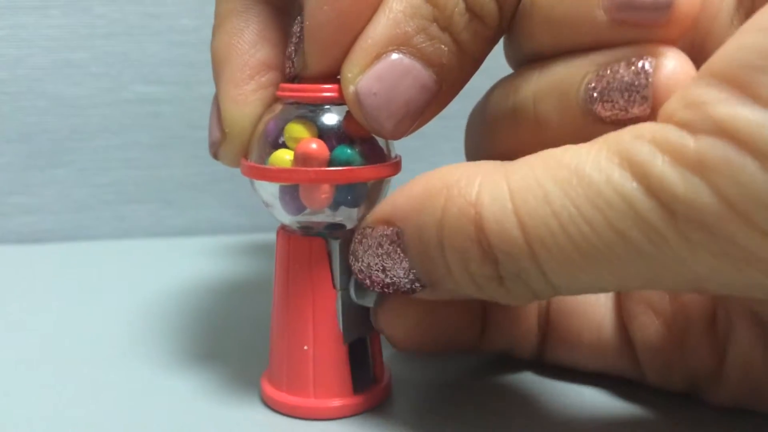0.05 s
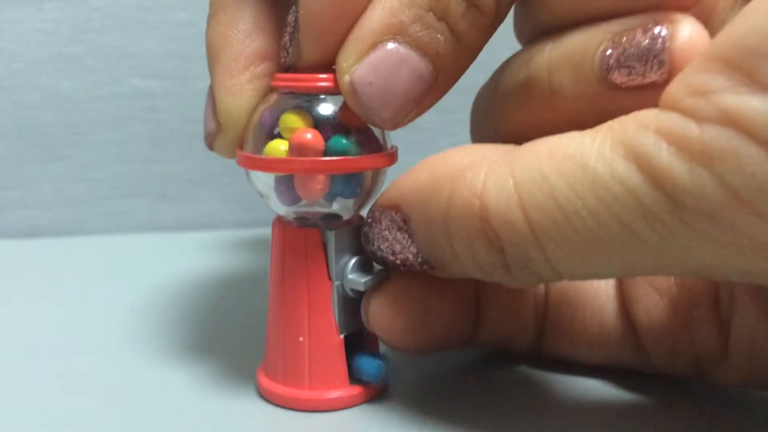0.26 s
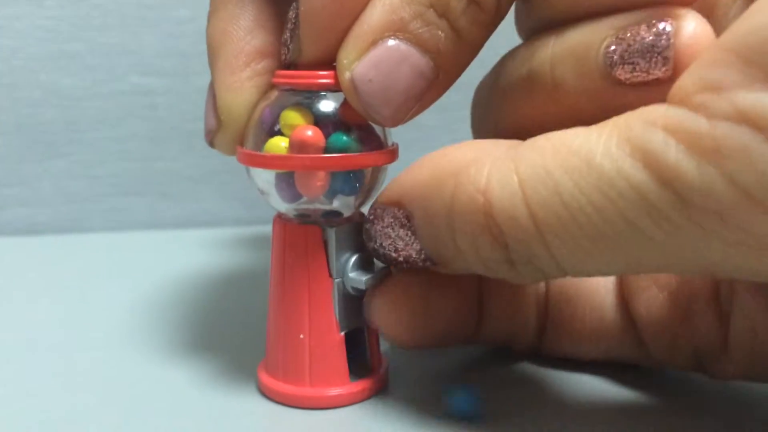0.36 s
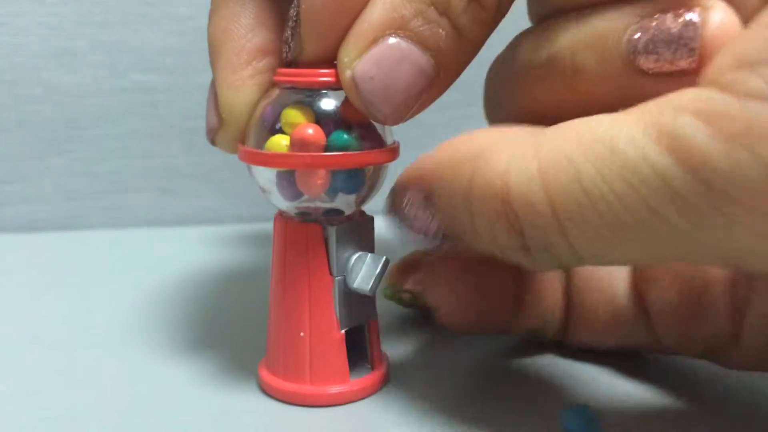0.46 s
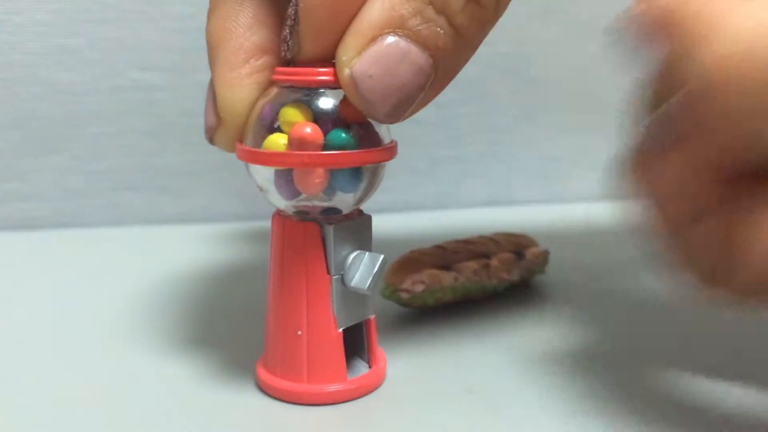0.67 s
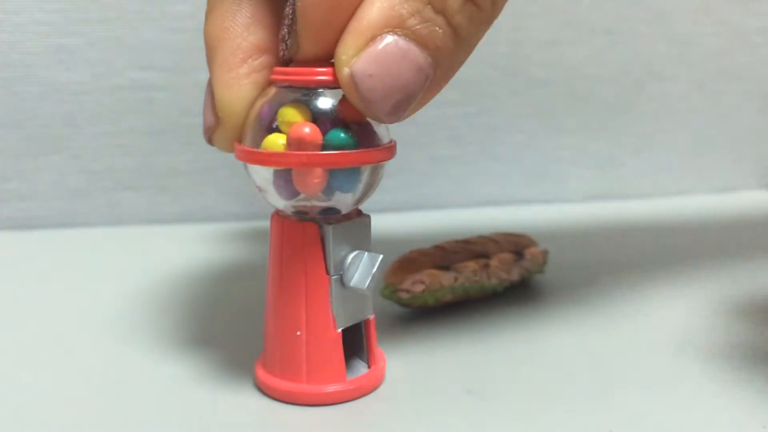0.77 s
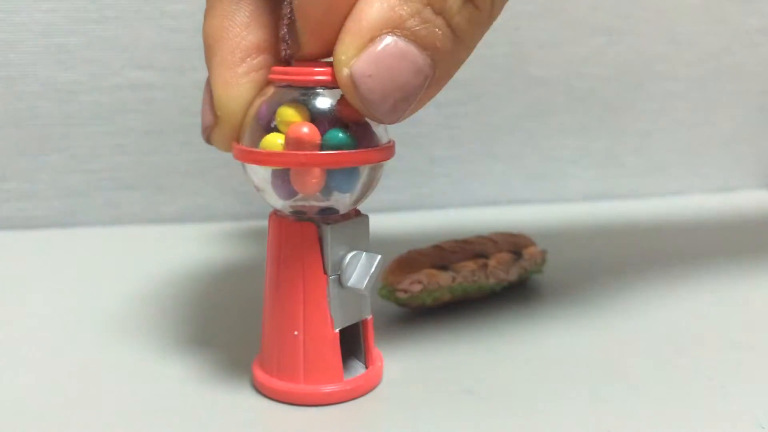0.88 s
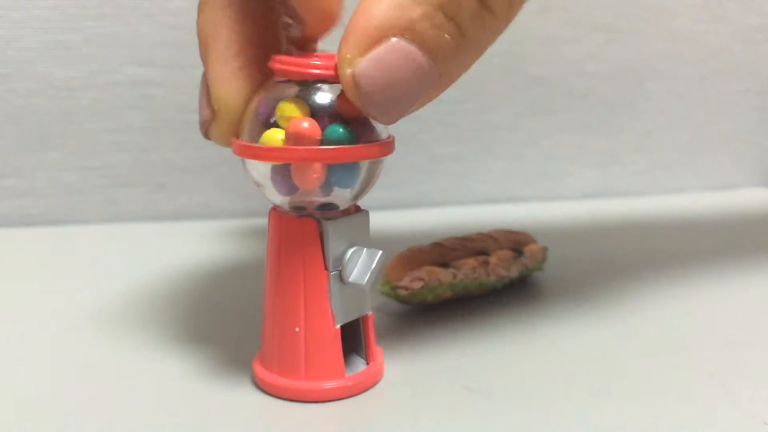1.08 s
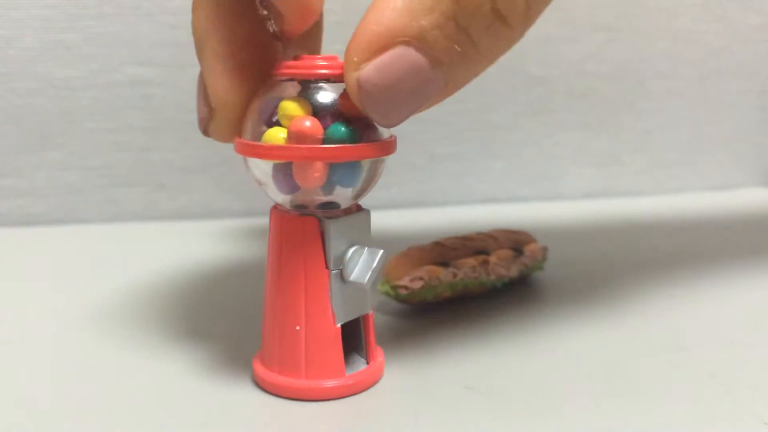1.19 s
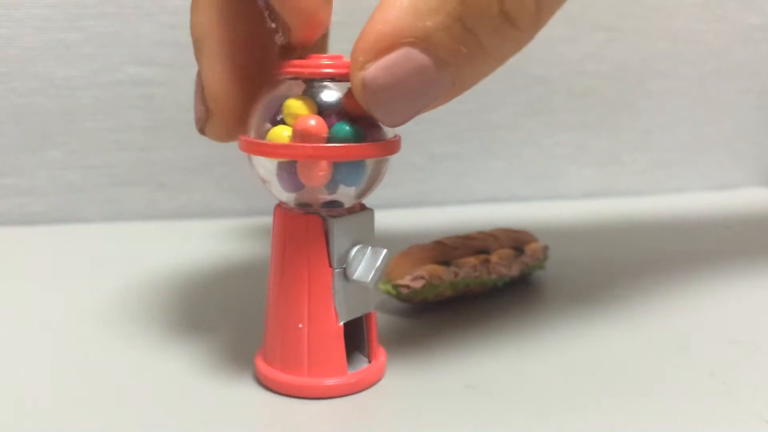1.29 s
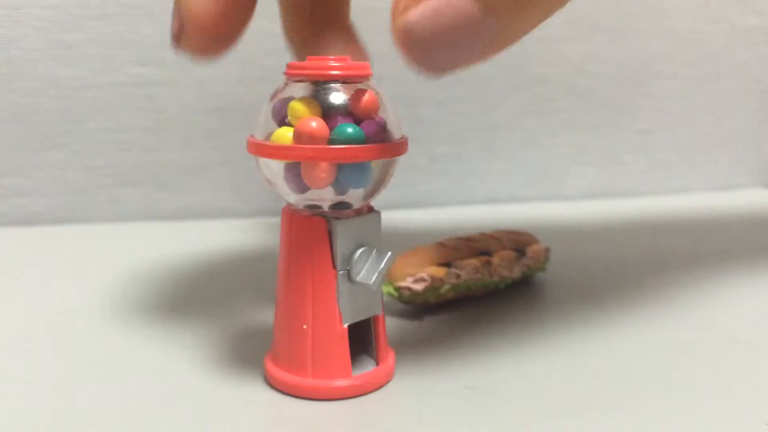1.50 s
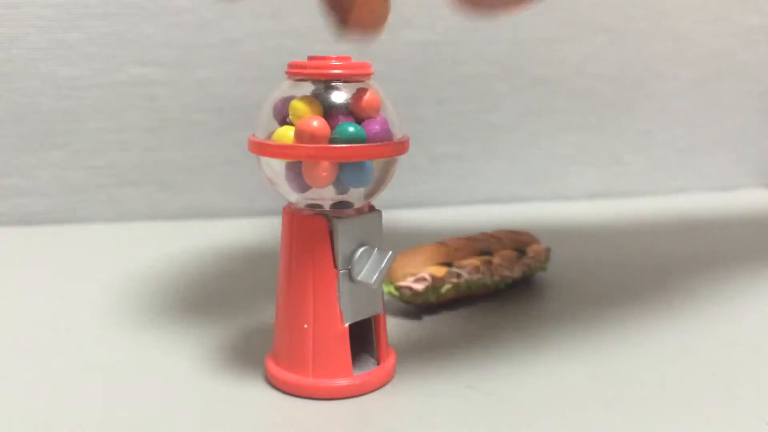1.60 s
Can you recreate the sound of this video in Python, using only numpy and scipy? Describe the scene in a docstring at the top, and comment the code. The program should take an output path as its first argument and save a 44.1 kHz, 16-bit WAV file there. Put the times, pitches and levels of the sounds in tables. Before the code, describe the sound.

A tiny plastic gumball machine clicks sharply as its knob is turned. A hard little ball drops, bounces on the table and rolls away, then knocks against something. Fingers rub faintly, all close by in a quiet room.

```python
"""A tiny plastic gumball machine snaps in a run of clicks as its knob is turned, close by on a table.
Each snap makes the plastic shell ring. A hard little ball rattles down the chute, bounces on the table
and rolls away; it knocks against something, rebounds and creeps on.
Fingers rub and nudge the toy, a hand slides over the table, and the quiet room rumbles faintly."""
import sys
import numpy as np
from scipy import signal
from scipy.fft import rfft, irfft
from scipy.io import wavfile

SR = 44100
rng = np.random.default_rng(int(sys.argv[2]) if len(sys.argv) > 2 else 0)


def file_out(sig):
    """Save sig as 16-bit WAV at sys.argv[1]."""
    # one column per channel
    cols = np.atleast_2d(sig).T
    # limit, then scale
    lim = np.clip(cols, -1, 1)
    pcm = np.round(lim * 32767).astype(np.int16)
    wavfile.write(sys.argv[1], SR, pcm)


N = 72765

# clicks of the knob, chute and handling: t/s, level/dB, middle tones/dB, treble/dB, rebound/dB
CLICKS = [(0.1525, -63.5, 4, -37.5, -3.5), (0.166, -59, 11, -35.5, -4), (0.1843, -64.5, 5, -30, -8),
          (0.209, -58, -1.5, -34.5, -8.5), (0.2112, -71, -6.5, -30, -8.5), (0.213, -54, 8.5, -41.5, -15),
          (0.2285, -59, 6, -22, -3.5), (0.2315, -41.5, 5, -3, -4.5), (0.235, -47.5, -0.5, -21, -12),
          (0.2373, -30, 8, -16.5, -11), (0.2427, -37, 14.5, -21.5, -21), (0.2448, -43, 22, -14, 6),
          (0.2479, -19, 3.5, 7.5, -30), (0.2543, -24.5, -2, 4, -9), (0.2600, -25, 3, 1, -14),
          (0.2664, -38, 19, -17.5, -10), (0.2749, -53.5, 21, -21, -21.5), (0.2881, -42.5, 2, -23, -18),
          (0.2967, -25.5, 17, 17, -23), (0.3098, -33, -8, -16, -29), (0.3319, -32.5, 15, 10.5, -34),
          (0.3507, -46, 17, -7, -24), (0.45, -40.5, 13, -6, -15), (0.4660, -44.5, 1, -29, -8),
          (0.4730, -37, 15, -17.5, -26)]
# tones the plastic shell rings with: f/Hz, level/dB, fade/s (the time to die away by 60 dB)
SHELL_TONES = [(1130, -27, 0.0062), (1550, -38.5, 0.0014), (2320, -24.5, 0.0035), (4690, -7.5, 0.003),
               (5590, -4, 0.0028), (6870, -4, .0028), (8300, -1.5, .0028), (9500, 0.5, 0.0032),
               (11880, -6, 0.003), (13200, -10.5, 0.0019)]
def toy_clicks():
    """Each snap rebounds once, chatters briefly and rings the small plastic shell."""
    out, t = np.zeros(N), np.arange(N // 16) / SR
    for start, db, middle_db, treble_db, rebound_db in CLICKS:
        ring = np.zeros(len(t))
        for k, (hz, tone_db, fade_s) in enumerate(SHELL_TONES):
            hz *= 1 + 0.013 * rng.standard_normal()  # no two clicks sound quite alike
            ring += (-1) ** k * gain(tone_db - 60 * t / fade_s) * np.sin(2 * np.pi * hz * t)
        contacts = echoes(fade_s=0.0053, db=-4.5)
        add(contacts, 0.00052, gain([rebound_db]))  # the rebound, half a millisecond later
        colour = [(150, middle_db - 24), (900, middle_db), (2300, middle_db),
                  (4500, 0.0052), (16000, treble_db)]
        push = through(contacts, ring_from(colour))
        add(out, start, hit(through(push, ring), db))
    return out


# hits of the ball: t/s, level/dB, treble cut-off/Hz, rattle/dB
BOUNCES = [(0.3900, -23, 8300, -15.5), (0.413, -25.5, 4400, -13), (0.424, -33.5, 3470, -8),
           (0.4269, -42, 2700, 16), (0.4477, -43, 2600, -11), (0.4503, -35, 3670, -10),
           (0.518, -45, 2520, -7), (0.5534, -44, 1700, -4), (0.7014, -44, 1350, -11),
           (0.883, -54.5, 3500, 17), (0.9447, -55, 3800, -6), (1.2318, -59.5, 12000, -1),
           (1.2427, -22, 12900, -4), (1.2643, -28, 5060, -16), (1.2738, -34, 2330, -20),
           (1.2772, -40.5, 3050, 6), (1.2816, -39, 5020, 5), (1.2867, -43, 2800, 4),
           (1.2915, -48, 2000, -4), (1.3885, -54.5, 4050, -40), (1.4312, -58.5, 3000, -4),
           (1.4422, -66, 2995, 3), (1.464, -68, 2500, -15.5)]
# how the table rings when struck: f/Hz, level/dB
TABLE_RING = [(150, -64), (600, -30), (1100, -17), (1600, -7.5), (2200, 1), (2700, -4), (3150, -12.5),
              (3800, -8.5), (5000, -4.5), (5850, -17), (7200, -4.5), (10000, -9.5), (15000, -20)]
# how the thing in the ball's way rings: f/Hz, level/dB
OBSTACLE_RING = [(150, -43), (500, -16.5), (950, -4.5), (2000, 3.5), (2700, 1), (3700, -3.5), (4400, -17),
                 (5000, -4), (5700, -14), (6400, -1), (8000, -6.5), (12000, 0.5), (15000, -11)]
def ball_bounces(obstacle_from_s=1.23):
    """The ball strikes the table, later an obstacle; softer contacts sound duller."""
    out = np.zeros(N)
    for start, db, cut_hz, rattle_db in BOUNCES:
        ring = ring_from(TABLE_RING if start < obstacle_from_s else OBSTACLE_RING, cut_hz=cut_hz)
        rattle = echoes(fade_s=0.011, db=rattle_db)
        add(out, start, hit(through(rattle, ring), db))
    return out


# how loud the rolling is: t/s, level/dB
ROLL_LEVEL = [(0.43, -48.5), (0.46, -48.5), (0.5, -49.5), (0.543, -53.5), (0.565, -54), (0.61, -55.5),
              (0.655, -55.5), (0.688, -61), (0.72, -60.5), (0.82, -63.5), (0.9, -67), (0.938, -71.5),
              (1.03, -71.5), (1.235, -74), (1.29, -62), (1.315, -69), (1.41, -80), (1.52, -74), (1.65, -78)]
# how the table rings at one small bump: f/Hz, level/dB
BUMP_RING = [(150, -26.5), (500, -20), (950, -8), (1350, 1.5), (1700, 4), (2400, -1), (2900, -3.5),
             (3500, -31.5), (5000, -18), (6500, -46), (15000, -67)]
# hiss of fine grit under the ball: f/Hz, level/dB
GRIT_HISS = [(150, -4), (700, -2), (1500, 3.5), (3500, -5), (5000, -4), (6300, -9), (7500, -17),
             (15000, -27)]
def ball_rolling(first_bumps_per_s=440, half_speed_s=1.1):
    """The uneven ball taps the table very fast, then slower, softer and lower as it loses speed."""
    out = np.zeros(N)
    now = start = ROLL_LEVEL[0][0]
    for gap, strength, pitch in rng.standard_normal((N // 100, 3)):
        if now >= N / SR:
            break
        age = now - start
        bumps_per_s = first_bumps_per_s / (1 + age / half_speed_s)
        db = np.interp(now, *np.array(ROLL_LEVEL).T) + 3 * strength
        octaves = 0.082 * pitch - 0.44 * min(age, 0.5)  # the pitch sinks for half a second
        colour = np.array(BUMP_RING) * [2 ** octaves, 1]
        ring = ring_from(colour, tilt_db=1.5 * strength)  # harder bumps are brighter
        add(out, now, ring * gain(db) * np.sqrt(SR / bumps_per_s))
        now += np.exp(0.33 * gap) / bumps_per_s
    return out + hiss(GRIT_HISS, ROLL_LEVEL) * gain(-14.5)


def tabletop(ball):
    """The tabletop rings on briefly after each touch of the ball."""
    after_ring = echoes(fade_s=0.03, db=-15.5)
    after_ring[0] = 0  # keep only what follows the touch
    return through(through(ball, after_ring), ring_from(BUMP_RING)) * gain(-6.5)


# soft knocks: t/s, level/dB, f/Hz, fade/s
NUDGES = [(0.2545, -38.5, 1188, 0.033), (0.4664, -38.5, 1120, 0.041), (0.466, -49.5, 185, 0.021),
          (0.9711, -51, 870, 0.023), (0.98, -51, 204, 0.01), (1.1271, -50, 740, 0.019),
          (1.1704, -52.5, 724, 0.0077), (1.1973, -55, 700, 0.0065), (1.482, -54.5, 191, 0.047)]
def nudges(width_octaves=0.69):
    """Fingers and the toy's foot make dull knocks, each around one pitch."""
    out, spread = np.zeros(N), 2 ** width_octaves
    for start, db, hz, fade_s in NUDGES:
        colour = [(hz / 20, -45), (hz / spread ** 2, -20), (hz, 0), (hz * spread, -14), (hz * 10, -42)]
        add(out, start, hit(through(echoes(fade_s, db=0), ring_from(colour)), db))
    return out


# finger strokes: t/s, length/s, level/dB, treble tilt/dB per octave, treble cut-off/Hz
RUBS = [(0.0, 0.11, -67, 6, 327), (0.202, 0.085, -60.5, 3.5, 700), (0.968, .014, -60.5, 6.5, 12000),
        (1.057, 0.014, -66, 3, 12000), (1.126, 0.011, -62.5, 5.5, 9000), (1.462, 0.038, -59.5, -3.5, 9000),
        (1.499, 0.0053, -60.5, 7, 8050)]
# sound of skin on plastic: f/Hz, level/dB
SKIN_COLOUR = [(25, -26), (100, -13.5), (450, -18), (1300, -3), (2300, -0.5), (3800, -10), (6700, -11),
               (9000, -17.5), (15000, -22.5)]
def finger_rubs(grains_per_s=1700):
    """Skin rubs over the plastic in short bursts of tiny random ticks."""
    out = np.zeros(N)
    for start, length_s, db, tilt_db, cut_hz in RUBS:
        n = int(length_s * SR)
        grains = rng.standard_normal(N) * (rng.random(N) < grains_per_s / SR)
        stroke = grains[:n] * signal.windows.tukey(n, 0.5)  # fade in and out
        rub = signal.fftconvolve(stroke, ring_from(SKIN_COLOUR, tilt_db, cut_hz))
        add(out, start, unit(rub) * np.sqrt(n) * gain(db))
    return out


# hiss of a hand on the table: f/Hz, level/dB
SLIDE_HISS = [(200, 0), (1000, 5), (4000, -4.5), (7500, 3), (11000, -2), (14500, 0.5), (16000, -3)]
# how loud that hiss is: t/s, level/dB
SLIDE_LEVEL = [(0.46, -69), (0.56, -69.5), (0.64, -62.5), (0.71, -68.5), (0.77, -64), (0.81, -68),
               (0.9, -73), (0.96, -77)]
def hand_slide():
    """A faint hiss swells and fades as the hand draws back over the table."""
    return hiss(SLIDE_HISS, SLIDE_LEVEL)


# background noise of the room: f/Hz, level/dB
AIR_COLOUR = [(12, -55), (25, -22), (40, -10), (65, 2), (120, -1), (200, -1.5), (300, -9.5), (600, -11),
              (1500, -14.5), (4000, -20), (10000, -26.5), (15000, -32.5), (16000, -38.5)]
def room_air():
    """The room has a steady low rumble and hiss."""
    return through(rng.standard_normal(N), ring_from(AIR_COLOUR)) * gain(-69.5)


def gain(db):
    """Turn decibels into a number to multiply by."""
    return 10 ** (np.asarray(db) / 20)


def unit(x):
    """Scale a sound to an energy of one."""
    return x / np.sqrt(np.sum(x ** 2) + 1e-18)


def hit(x, db):
    """Scale a short sound to its level as if all of it fell in one millisecond."""
    return unit(x) * gain(db) * np.sqrt(SR / 1000)


def add(out, start_s, x):
    """Mix x into out from start_s on."""
    i = max(int(round(start_s * SR)), 0)
    out[i:i + len(x)] += x[:len(out) - i]


def through(x, ring):
    """Let every sample of x set off the given ring."""
    return signal.fftconvolve(x, ring)[:len(x)]


def ring_from(colour, tilt_db=0, cut_hz=1e6, size=2048):
    """Turn a tone colour (f/Hz, level/dB) into a short ring, dulled above cut_hz."""
    f = np.maximum(np.arange(size // 2 + 1) * SR / size, 10)
    hz, db = np.array(colour, float).T
    curve_db = np.interp(np.log(f), np.log(hz), db)
    curve_db += tilt_db * np.log2(np.maximum(f, 1000) / 1000)  # per octave above 1000 Hz
    spectrum = gain(curve_db) / np.sqrt(1 + (f / cut_hz) ** 4)
    # keep the colour, but pack the sound at the start, as in a real tap
    cepstrum = irfft(np.log(spectrum))
    cepstrum[1:size // 2] *= 2
    cepstrum[size // 2 + 1:] = 0
    return unit(irfft(np.exp(rfft(cepstrum))))


def echoes(fade_s, db, size=4096):
    """One sharp tick, then a blur of dying echoes; db sets their level against the tick."""
    t = np.arange(size) / SR
    rise_and_fall = (1 - np.exp(-t * 4000)) * gain(-60 * t / fade_s)
    x = gain(db) * unit(rng.standard_normal(size) * rise_and_fall)
    x[0] = 1
    return x


def hiss(colour, levels):
    """Noise with a tone colour, silent at first and then following levels (t/s, level/dB)."""
    db = np.interp(np.arange(N) / SR, *np.array(levels).T, left=-np.inf)
    return through(rng.standard_normal(N), ring_from(colour)) * gain(db)


def scene():
    """Toy, ball and hands on the table, with a trace of room echo and air."""
    ball = ball_bounces() + ball_rolling()
    near = toy_clicks() + ball + tabletop(ball) + nudges() + finger_rubs() + hand_slide()
    room = echoes(fade_s=0.19, db=-27.5, size=16384)
    return through(near, room)[None] + room_air()


def record(dry, smear_hz=5900, top_hz=15250):
    """The microphone smears the sharpest edges a little and the recorder cuts the highest treble."""
    _, poles = signal.iirpeak(smear_hz, Q=0.8, fs=SR)
    smeared = signal.lfilter(poles[::-1], poles, dry)  # delays some pitches, keeps their levels
    return signal.sosfilt(signal.ellip(8, 0.2, 70, top_hz, fs=SR, output="sos"), smeared)


dry = scene()
out = record(dry)
file_out(out)
```